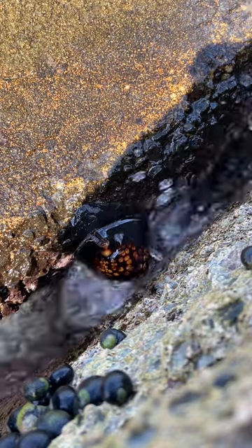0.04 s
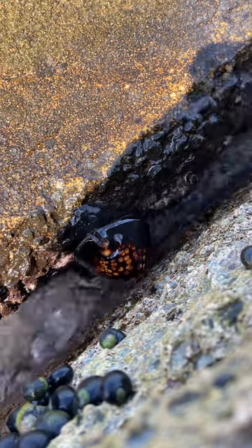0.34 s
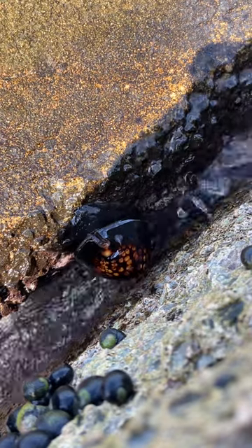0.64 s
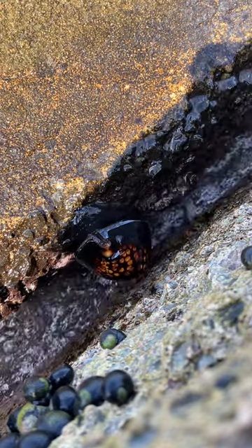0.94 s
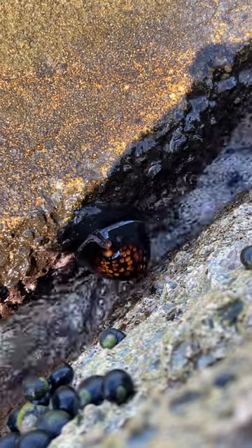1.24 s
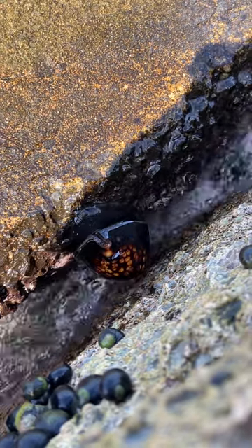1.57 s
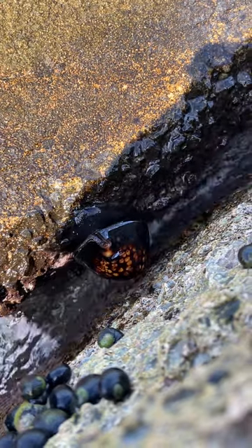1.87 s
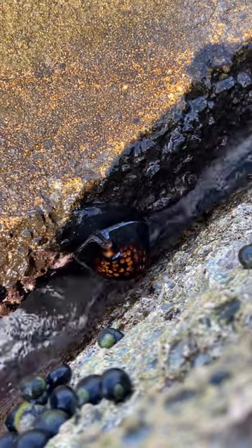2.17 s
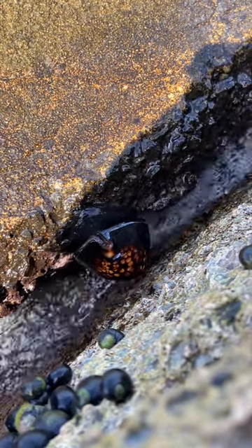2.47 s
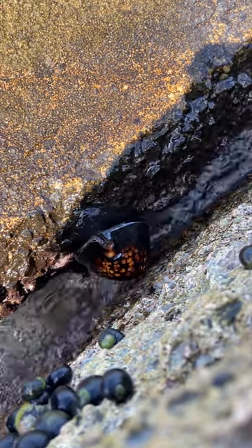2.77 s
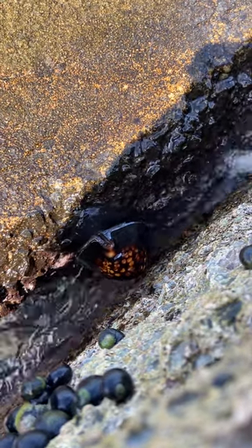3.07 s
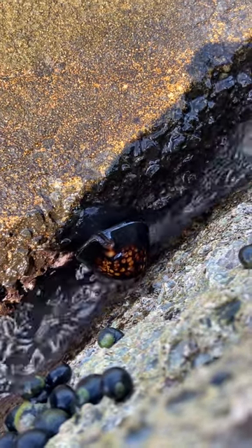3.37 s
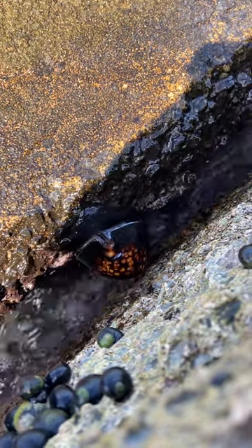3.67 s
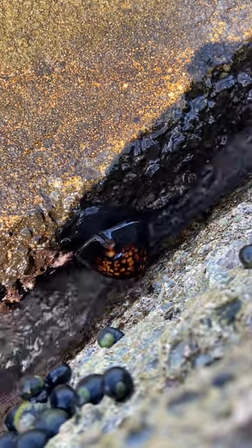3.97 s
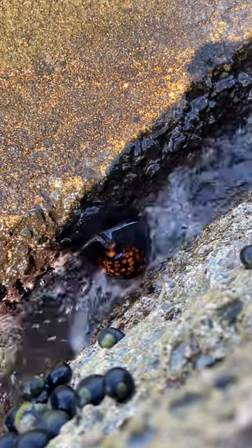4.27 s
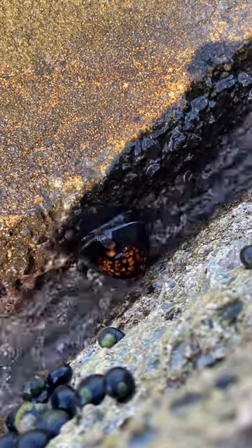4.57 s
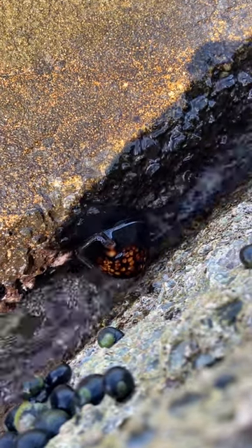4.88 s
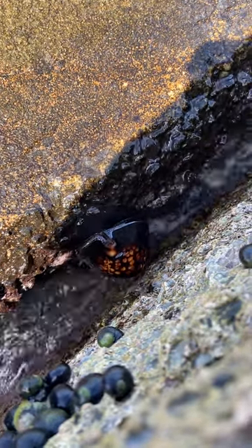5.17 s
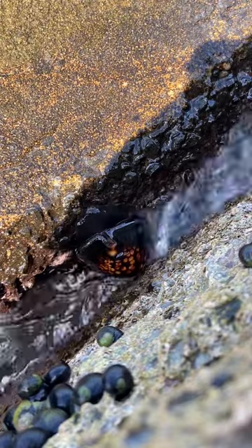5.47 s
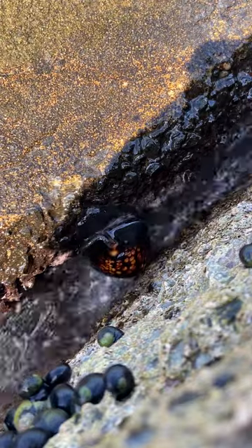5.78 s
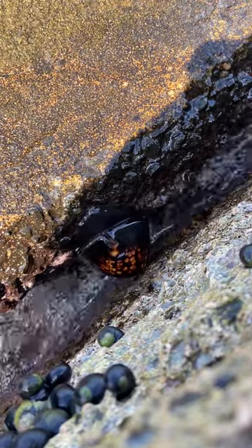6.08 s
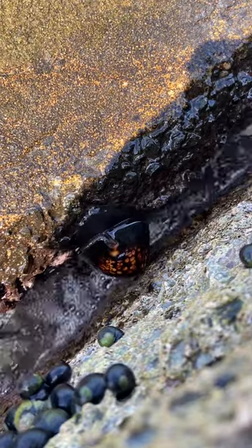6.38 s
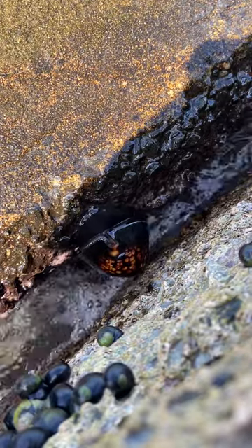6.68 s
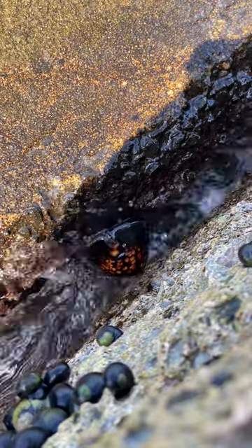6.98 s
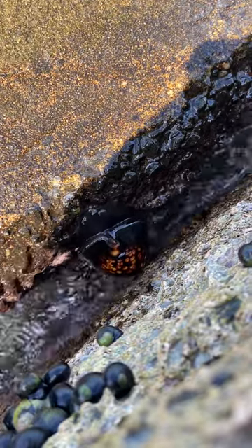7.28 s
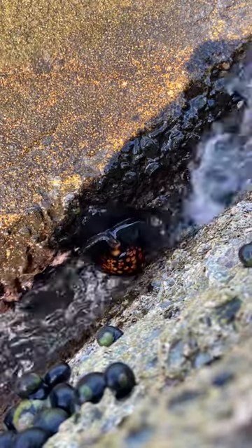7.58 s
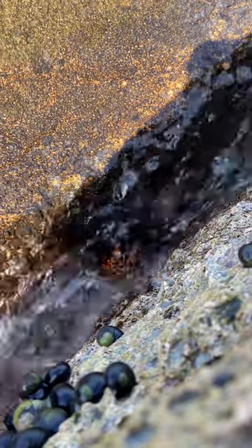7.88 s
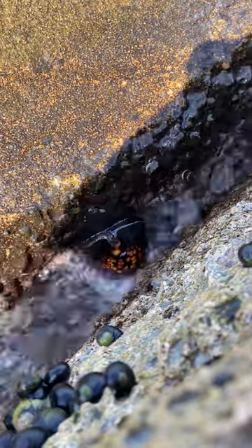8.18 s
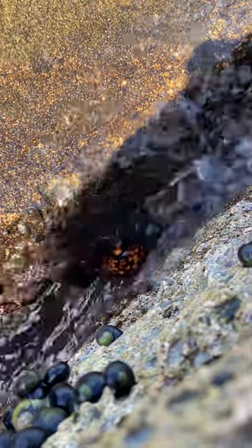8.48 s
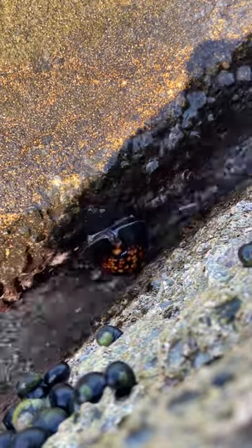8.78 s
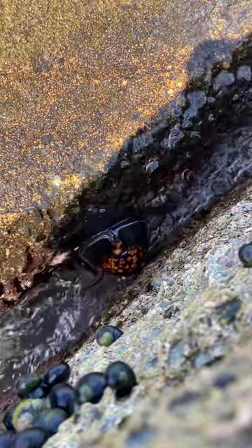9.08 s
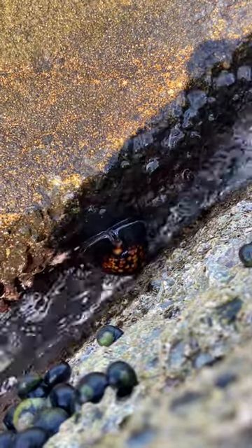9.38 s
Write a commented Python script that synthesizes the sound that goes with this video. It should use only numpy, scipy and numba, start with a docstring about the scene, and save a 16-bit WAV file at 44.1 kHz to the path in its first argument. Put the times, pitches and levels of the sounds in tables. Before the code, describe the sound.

Seawater surges, gurgles and splashes through a narrow rock crack while wind gusts buffet the microphone over a distant sea rumble.

```python
"""Seawater surges through a crack between stone blocks, close below a phone.
Each surge throws spray and traps air: foam fizzes, bubbles ring and rise in pitch, big pockets gulp,
and water slaps and ticks on the stone. Gusts buffet the microphone and hard eddies thump it.
Underneath, the open sea rumbles far off and a fine hiss holds steady."""
import sys
import numpy as np
from scipy import signal
from scipy.fft import rfft, irfft
from scipy.io import wavfile
from scipy.ndimage import uniform_filter1d
from numba import njit

SR = 44100
rng = np.random.default_rng(int(sys.argv[2]) if len(sys.argv) > 2 else 0)


def master_out(mix):
    """Clip the mix to full scale and print it as 16-bit PCM to the path in sys.argv[1]."""
    frames = np.transpose(np.atleast_2d(mix))
    ceiling = np.clip(frames, -1, 1)
    pcm = np.round(ceiling * 32767).astype(np.int16)
    wavfile.write(sys.argv[1], SR, pcm)


N = 424683
TIME = np.arange(N) / SR
FREQS = np.arange(N // 2 + 1) * SR / N
SIDE = np.array([[1], [-1]])  # adds to the left, subtracts from the right


def undb(db):
    """Decibels to gain."""
    return 10 ** (np.asarray(db) / 20)


def unit(x):
    """Scale to rms 1."""
    return x / np.sqrt(np.mean(x ** 2))


def over_hz(points):
    """Join (frequency [Hz], value) points on a log-frequency axis."""
    hz, value = np.transpose(points)
    return np.interp(np.log(FREQS + 1), np.log(hz), value)


def shape(x, gain):
    """EQ with a gain for each frequency."""
    return irfft(rfft(x) * gain, N)


def even(x, span_s):
    """Level out slow swells and keep the quick ones."""
    return x / np.sqrt(uniform_filter1d(x ** 2, int(span_s * SR)) + 1e-12)


def spurts(rate, decay_s, spread_db, steady):
    """A drive of rms 1: `rate` random pushes a second, each dying away, over a steady floor."""
    count = int(rate * N / SR)
    when, size = rng.random((8000, 2))[:count].T
    pushes = np.bincount((when * N).astype(int), undb(-spread_db * np.log(.03 + size)), N)
    drive = signal.lfilter([1], [1, -np.exp(-1 / (decay_s * SR))], pushes)
    return unit(unit(drive) + steady)


def blend(levels_db, colours):
    """Overlapping swells add in power and the loudest leads the colour: (level [dB], colour)."""
    power = undb(np.maximum(levels_db, -120)) ** 2
    total = power.sum(axis=0)
    return 10 * np.log10(total), np.array(colours, float) @ power / total


@njit
def lowpass(x, hz, damping):
    """State-variable low-pass with a moving cutoff."""
    y, band, low = np.empty(len(x)), 0., 0.
    for i in range(len(x)):
        g = np.tan(np.pi * min(hz[i], .4 * SR) / SR)
        v = (band + g * (x[i] - low)) / (1 + g * (g + damping))
        y[i] = low + g * v
        band, low = 2 * v - band, 2 * y[i] - low
    return y


@njit
def ring(start, size, hz, t60, rise):
    """Pings that swell within a cycle and glide by `rise` octaves as they die away."""
    out = np.zeros(N)
    for k in range(len(start)):
        first, length, phase = int(start[k] * SR), int(t60[k] * SR), 0.
        for i in range(min(length, N - first)):
            age = i / length
            phase += min(hz[k] * 2 ** (rise[k] * age), .45 * SR) / SR
            envelope = size[k] * (1 - np.exp(-2 * phase)) * 1000 ** -age
            out[first + i] += envelope * np.sin(2 * np.pi * phase)
    return out


def surging():
    """Each surge builds to its crest and drains away, over a trickle: (level [dB], spray [dB])."""
    # surges in the crack: (crest time [s], level [dB], build [s], drain [s], spray over gurgle [dB])
    surges = [(0.239, -25, 1, 0.28, -11), (0.258, -19.5, 0.031, 0.027, -3), (0.578, -28, 0.51, 0.32, -6.5),
              (0.84, -27, 0.023, 0.1, -12), (1.119, -43.5, 0.64, 0.38, -11), (1.83, -47, 0.46, 0.43, -7),
              (2.222, -44.5, 0.22, 0.027, 3.5), (3.182, -37.5, 0.27, 0.07, -8.5),
              (3.418, -38.5, 0.25, 0.56, -5), (4.122, -31, 0.35, 0.32, -2), (4.272, -26.5, 0.033, 0.074, 0),
              (4.728, -38, 0.18, 0.12, 0.5), (5.098, -36, 0.2, 1, -2.5), (5.456, -28.5, 0.78, 0.34, -8.5),
              (5.749, -35, 0.099, 0.1, -3), (6.912, -42, 0.47, 0.097, 0), (7.243, -40, 0.71, 0.17, -10),
              (7.564, -29.5, 0.31, 0.87, -8), (7.835, -27.5, 0.15, 0.46, -11.5),
              (8.189, -33, 0.1, 0.16, -8.5), (8.366, -30.5, 0.088, 0.41, -15),
              (8.6, -33.5, 0.086, 0.69, -10), (8.772, -26, 0.02, 0.1, -8.5),
              (9.088, -39, 0.16, 0.29, -11.5)]
    range_db = 20.5  # climbed in one build time, lost in one drain time
    trickle_db, trickle_spray_db = -59, 5
    swells = [db - range_db * np.maximum((crest - TIME) / build, (TIME - crest) / drain)
              for crest, db, build, drain, _ in surges]
    return blend(swells + [np.full(N, trickle_db)], [row[-1] for row in surges] + [trickle_spray_db])


def swarm(count, low_hz, high_hz, cycles, rise, spread_db, drive):
    """Bubbles of all sizes, born in clusters when the drive is high; equal power per Hz."""
    when, pitch, strength, life, climb = rng.random((count, 5)).T
    start = np.interp(when, np.cumsum(drive) / drive.sum(), TIME)
    hz = (np.sqrt(low_hz) + pitch * (np.sqrt(high_hz) - np.sqrt(low_hz))) ** 2
    t60 = cycles * 2 ** (2 * life - 1) / np.sqrt(hz * 1000)  # about `cycles` periods at 1 kHz
    size = undb(-spread_db * np.log(.035 + strength)) * np.sqrt(np.sqrt(hz) / t60)
    return even(ring(start, size, hz, t60, rise * climb ** 2), span_s=.25)


def wash():
    """Churning water: the same spurts throw up hissing foam, bursting droplets and ringing bubbles."""
    # colour of the churning water: (frequency [Hz], level [dB])
    water_eq = [(60, -26), (200, 0.5), (700, -2.1), (2200, 0.04), (3200, -1), (5500, 2), (8000, -13),
                (11000, -8), (16000, -20.5)]
    level_db, spray_db = surging()
    drive = uniform_filter1d(spurts(rate=75, decay_s=.007, spread_db=4.8, steady=.3), size=200)
    fizz = rng.standard_normal(N) + undb(-4) * rng.standard_normal((2, N))  # foam lines the whole crack
    foam = even(drive * fizz, span_s=.33)
    droplets = swarm(11000, low_hz=900, high_hz=16000, cycles=6, rise=.1, spread_db=8, drive=drive)
    bubbles = swarm(4800, low_hz=280, high_hz=3600, cycles=21, rise=.2, spread_db=5.8, drive=drive)
    # films of foam burst with a dry, bright tick
    bursts = spurts(rate=30, decay_s=.0015, spread_db=6, steady=0) * rng.standard_normal(N)
    ticks = unit(shape(bursts, FREQS / (FREQS + 12000)))
    churn = unit(foam + .85 * droplets + .8 * bubbles + .75 * ticks)
    lull_db, flood_db = -59, -21  # toward either level the grain blurs into an even fizz
    blur = np.minimum(undb(lull_db - level_db) ** 2 + undb(level_db - flood_db) ** 2, .55)
    texture = np.sqrt(1 - blur) * churn + np.sqrt(blur) * unit(fizz)
    water = unit(shape(texture, undb(over_hz(water_eq))))
    gurgle = shape(water, 1 / (1 + (FREQS / 2400) ** 2) ** 2)
    spray = water - gurgle
    return undb(level_db) * (gurgle * undb(-spray_db / 2) + spray * undb(spray_db / 2))


def crack(water, t60_s, wall_db):
    """Narrow stone walls add a brief scatter; the two microphone ports hear the crack differently."""
    # phase between the ports: (frequency [Hz], left lead [rad])
    port_phase = [(100, 0), (430, -.4), (4300, .9), (5300, .4), (7300, 3.2), (10500, 6.3), (13500, 9.4),
                  (16000, 12.5)]
    # balance between the ports: (frequency [Hz], left minus right [dB])
    port_balance = [(380, 1.5), (700, -9.5), (1300, 4), (2300, -1), (2900, -4), (4500, -1.5), (5400, 0)]
    age = TIME[:SR // 5]
    scatter = rng.standard_normal((2, len(age))) * undb(-60 * age / t60_s) * (age > .001)
    scatter /= np.sqrt(np.sum(scatter ** 2, axis=1, keepdims=True))
    walls = undb(wall_db) * signal.fftconvolve(water, scatter, axes=1)[:, :N]
    ports = undb(SIDE / 2 * over_hz(port_balance)) * np.exp(1j * SIDE / 2 * over_hz(port_phase))
    return shape(water + walls, ports)


def sea(level_db):
    """Far surf: a dull rumble that swells a little."""
    # colour of the far sea: (frequency [Hz], level [dB])
    sea_eq = [(25, -32), (55, 9), (220, 2.5), (330, -1), (550, -13.5), (2500, -33), (15000, -104)]
    mid, side = shape(rng.standard_normal((2, N)), undb(over_hz(sea_eq)))
    swell = spurts(rate=14, decay_s=.15, spread_db=2, steady=1.2)
    width = FREQS / (FREQS + 300)  # long waves reach both ports alike
    return undb(level_db) * swell * unit(mid + shape(side, width) / 2 * SIDE)


def hiss(level_db, low_cut_hz):
    """A fine, even bed of hiss, unrelated at the two ports."""
    return undb(level_db) * unit(shape(rng.standard_normal((2, N)), FREQS / np.hypot(FREQS, low_cut_hz)))


def gusting():
    """Each gust hits fast, sags and lets go, over a steady breeze: (level [dB], upper edge [Hz])."""
    # gusts on the microphone: (start [s], length [s], level [dB], upper edge of the turbulence [Hz])
    gusts = [(0.086, 0.2, -36, 483), (0.41, 0.33, -32, 244), (0.635, 0.18, -30.5, 435),
             (1.673, 0.28, -39.5, 281), (2.01, 0.46, -29, 220), (3.364, 0.21, -31, 625),
             (3.721, 0.16, -27, 400), (4.22, 0.24, -37, 690), (4.445, 0.22, -32, 870),
             (5.136, 0.053, -31, 1020), (5.352, 0.13, -29.5, 1500), (5.527, .26, -32, 734),
             (5.855, 0.13, -29.5, 745), (6.043, 0.18, -22.5, 1200), (6.131, 0.15, -23, 1574),
             (6.297, 0.16, -27.5, 1210), (6.512, 0.074, -28, 760), (6.764, 0.16, -26.5, 930),
             (6.974, 0.28, -32.5, 920), (7.2, 0.1, -20, 1270), (7.355, 0.13, -16.5, 1500),
             (7.511, 0.44, -20.5, 1230), (8.052, 0.87, -32, 245), (8.65, 0.27, -29.5, 650),
             (9.013, 0.46, -28, 590), (9.216, 0.046, -27, 1160)]
    attack, sag, release = 550, 6, 248  # dB per second
    breeze_db, breeze_edge_hz = -43.5, 292
    swells = []
    for start, length, db, _ in gusts:
        age = TIME - start
        held_db = db - np.maximum(-attack * age, sag * age)
        swells.append(held_db - release * np.maximum(age - length, 0))
    return blend(swells + [np.full(N, breeze_db)], [row[-1] for row in gusts] + [breeze_edge_hz])


def wind(level_db, edge_hz):
    """Turbulence at the ports: separate puffs in light air, a dense, fluttering roar in strong gusts."""
    # colour of the turbulence ahead of its moving low-pass: (frequency [Hz], level [dB])
    turbulence_eq = [(25, -46), (52, 0), (85, -1.8), (250, -9.5), (600, -15.5), (1500, -25.5)]
    gale = np.minimum(edge_hz / 1600, 1)  # at 1 the eddies crowd into one roar
    puffs = spurts(rate=55, decay_s=.007, spread_db=4, steady=.18)
    roar = spurts(rate=240, decay_s=.003, spread_db=2, steady=.3)
    eddy = (1 - gale) * puffs + gale * roar
    roll = spurts(rate=45, decay_s=.016, spread_db=3, steady=.4) ** (1 - gale)
    cutoff_hz = edge_hz * np.minimum(eddy, 1.4) ** .3
    layers = []
    for noise in shape(rng.standard_normal((2, N)), undb(over_hz(turbulence_eq))):
        body = shape(noise, 1 / (1 + (FREQS / 180) ** 2))  # the largest eddies roll by more slowly
        flow = body * uniform_filter1d(roll, size=200) * undb(-3 * gale) + (noise - body) * eddy
        muffled = lowpass(lowpass(flow, cutoff_hz, 1.1), .85 * cutoff_hz, 1.6)
        layers.append(even(muffled, span_s=.09))
    mid, side = layers
    # flutter: small eddies, each sinking in pitch
    when, strength, pitch = rng.random((1600, 3)).T
    hz = edge_hz[(when * N).astype(int)] * (.45 + .5 * pitch)
    chirps = ring(when * N / SR, strength, hz, t60=10 / hz, rise=np.full(len(hz), -2.6))
    flutter = lowpass(even(chirps, span_s=.05), edge_hz, 1.1)
    pressure = undb(level_db) * (mid + undb(-4) * gale * flutter + undb(-13) * side * SIDE)
    overload = .7  # pressure at which the microphone flattens the peaks
    return overload * np.tanh(pressure / overload)


def drops(decay_s, centre_hz):
    """Flung spray lands on the stone: each drop is one sharp, bright tick."""
    # drops landing: (time [s], level [dB])
    landings = [(.073, -22), (.561, -20), (3.262, -25), (3.872, -29), (4.096, -23), (4.347, -14),
                (5.628, -19), (7.272, -26), (7.483, -21), (7.631, -17), (7.716, -19), (8.103, -27),
                (8.24, -21), (8.842, -26)]
    envelope = sum(undb(db) * (TIME >= s) * np.exp(-np.abs(TIME - s) / decay_s) for s, db in landings)
    band = np.exp(-np.log2((FREQS + 1) / centre_hz) ** 2)
    return envelope * unit(shape(rng.standard_normal(N), band))


def big_bubbles():
    """The surge pinches off pockets of air that ring; many rise in pitch as they near the surface. A few very
    short rows are narrow, ringing smacks of water on the stone."""
    # single bubbles and a few short smacks on the stone: (time [s], level [dB], pitch [Hz], t60 [s], rise
    # [octaves])
    bubbles = [(.206, -12, 700, .03, 0), (.371, -16, 1350, .02, 0), (.674, -15, 3800, .012, .1),
               (.816, -19, 600, .04, .1), (.873, -24, 650, .035, 0), (1.138, -31, 800, .04, 0),
               (1.162, -28, 700, .035, .1), (1.373, -37, 1160, .06, 0), (1.842, -33, 1020, .04, .3),
               (2.947, -32, 1020, .035, .15), (3.103, -37, 770, .1, .4), (3.154, -21, 3450, .014, .1),
               (3.205, -30, 2450, .04, .1), (3.367, -20, 730, .02, 0), (3.662, -30, 630, .1, .4),
               (3.873, -28, 1100, .06, .2), (4.257, -20, 470, .035, 0), (4.32, -27, 1030, .05, 0),
               (4.347, -12, 2300, .017, .15), (4.403, -26, 1850, .03, 0), (5.794, -11, 6050, .008, .1),
               (5.963, -28, 2600, .025, 0), (6.879, -26, 1030, .1, 2.6), (6.912, -18, 1660, .017, 0),
               (7.543, -11, 3900, .018, .3), (7.683, -12, 1000, .035, .2), (7.853, -9, 3700, .014, 0),
               (8.358, -17, 950, .035, .3), (8.605, -23, 1480, .035, .5), (8.639, -25, 1020, .04, .5)]
    start, db, hz, t60, rise = np.array(bubbles, float).T.copy()
    return ring(start, undb(db), hz, t60, rise)


def gulps():
    """A large pocket of air closes: its round tone swells, rises and is choked off."""
    # trapped air: (crest time [s], level [dB], crest pitch [Hz], swell [s], fade [s], rise [octaves/s])
    pockets = [(.263, -5, 312, .005, .016, 1), (8.797, -11, 620, .0065, .007, 42)]
    out = np.zeros(N)
    for crest, db, hz, swell, fade, rise in pockets:
        age = TIME - crest
        envelope = np.exp(-np.maximum(-age / swell, age / fade) ** 1.6)
        pitch = hz * 2 ** np.clip(rise * age, -1, 1)
        out += undb(db) * envelope * np.sin(2 * np.pi * np.cumsum(pitch) / SR)
    return out


def slaps():
    """Water strikes the stone: a short, band-passed burst of spray."""
    # hits on the stone: (time [s], peak level [dB], band pitch [Hz], t60 [s])
    hits = [(.351, -17, 1960, 0.088), (.65, -14, 4330, 0.0076), (0.972, -27, 2550, .04),
            (1.495, -32, 4900, 0.017), (2.416, -28.5, 4800, 0.025), (2.886, -27, 2560, 0.035),
            (3.082, -26, 3000, .017), (3.258, -25, 2860, 0.036), (3.368, -22, 1730, 0.045),
            (4.14, -12.5, 2560, .052), (4.227, -21.5, 920, .06), (4.256, -17.5, 3230, 0.034),
            (4.283, -14.5, 4850, 0.042), (4.425, -20.5, 2600, 0.061), (4.534, -22, 1545, 0.025),
            (4.569, -20, 4700, .013), (6.614, -18, 3000, 0.022), (6.854, -22.5, 4470, 0.022),
            (7.645, -11, 2020, 0.031), (7.776, -9.5, 4940, 0.052), (7.852, -6, 4100, 0.031),
            (8.387, -9.5, 2700, 0.036), (8.415, -9, 2560, 0.014), (8.785, -17, 1410, 0.037)]
    out, age = np.zeros(N + SR), TIME[:SR // 8]
    for start, db, hz, t60 in hits:
        band = signal.butter(1, [hz / 1.36, hz * 1.116], "band", fs=SR, output="sos")
        burst = signal.sosfilt(band, rng.standard_normal(len(age)) * undb(-60 * age / t60))
        first = int(start * SR)
        out[first:first + len(age)] += undb(db) * burst / np.abs(burst).max()
    return out[:N]


def thumps(centre_hz, t60_s, fall_octaves):
    """A hard eddy sweeps over the microphone: a ragged knock that dives in pitch."""
    # hard eddies: (time [s], level [dB])
    eddies = [(4.477, -17), (4.529, -20), (4.623, -22), (5.863, -17), (5.926, -18), (6.052, -14),
              (6.393, -14), (7.201, -10), (7.344, -11), (7.444, -7), (7.898, -13), (8.338, -20),
              (8.725, -16), (9.055, -18), (9.086, -21), (9.313, -22), (9.464, -20), (9.515, -22)]
    start, db = np.array(eddies, float).T.copy()
    each = np.ones_like(start)
    hz = centre_hz * 2 ** ((rng.random(len(start)) - .5) / 2)
    knocks = ring(start, undb(db), hz, t60_s * each, -fall_octaves * each)
    ragged = unit(shape(rng.standard_normal(N), np.exp(-(FREQS / 350) ** 2)))
    return knocks * (1 + ragged) / 2


def scene():
    """Water in the crack, wind on the microphone, the sea behind."""
    water = wash() + big_bubbles() + gulps() + slaps() + drops(decay_s=.0016, centre_hz=8500)
    water = crack(water, t60_s=.022, wall_db=-11)
    gust_db, edge_hz = gusting()
    buffeting = wind(gust_db, edge_hz) + thumps(centre_hz=720, t60_s=.042, fall_octaves=6)
    return water + buffeting + sea(level_db=-42.5) + hiss(level_db=-70, low_cut_hz=7000)


def record(dry):
    """The phone cuts the top steeply above 16.2 kHz."""
    return signal.sosfilt(signal.ellip(10, .2, 80, 16200, fs=SR, output="sos"), dry)


dry = scene()
out = record(dry)
master_out(out)
```